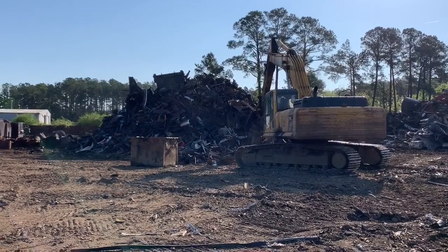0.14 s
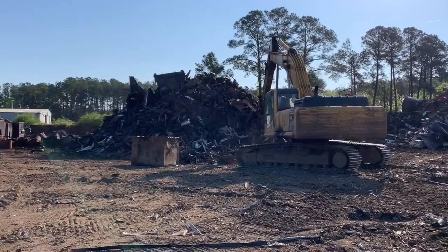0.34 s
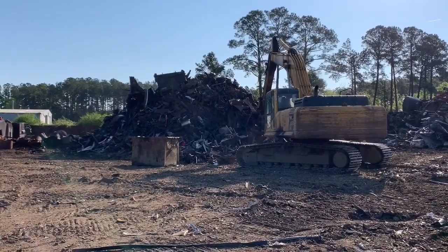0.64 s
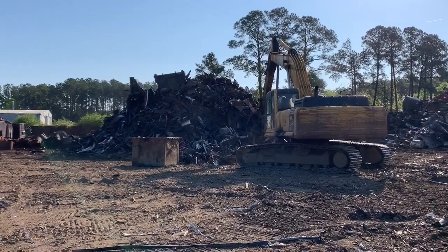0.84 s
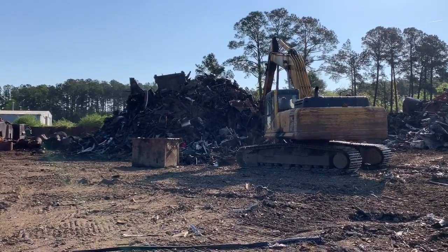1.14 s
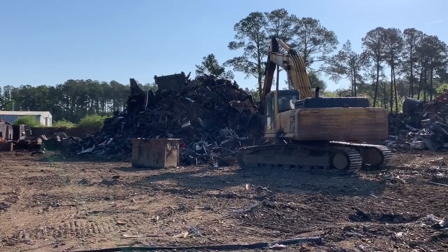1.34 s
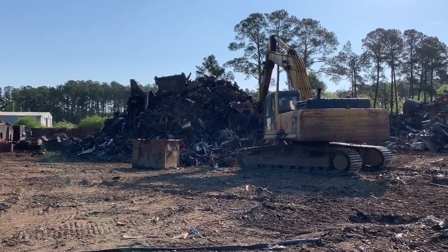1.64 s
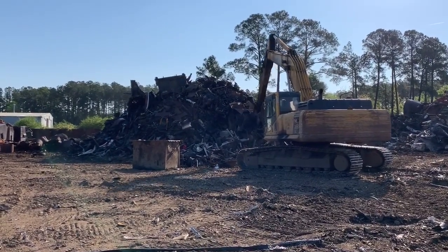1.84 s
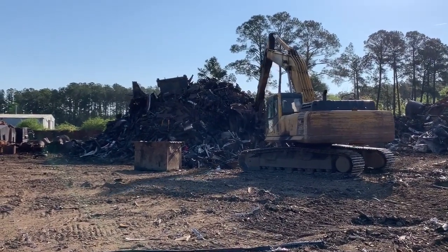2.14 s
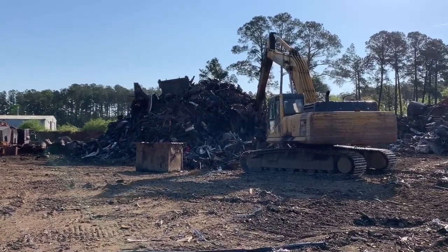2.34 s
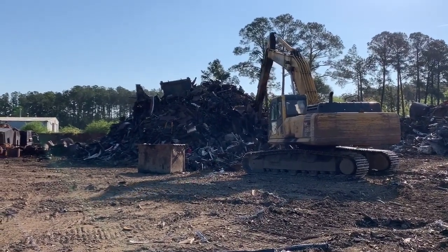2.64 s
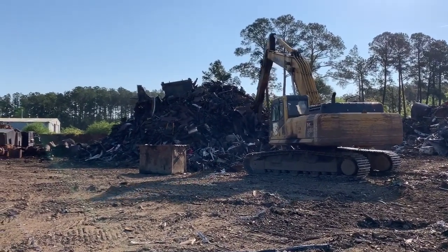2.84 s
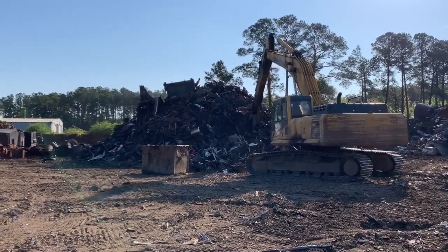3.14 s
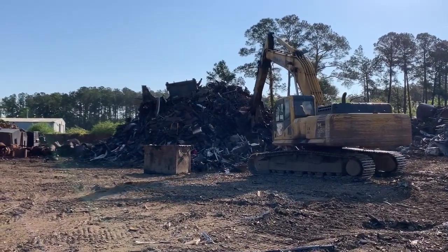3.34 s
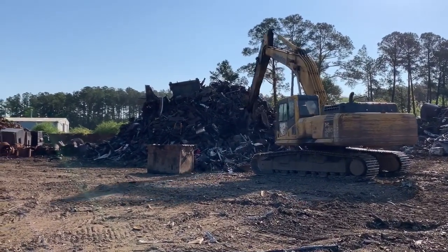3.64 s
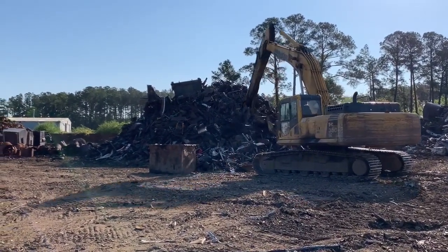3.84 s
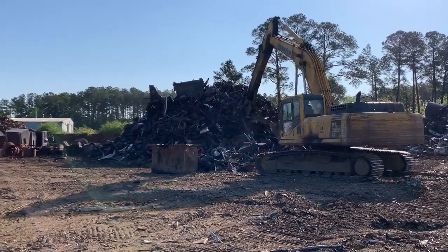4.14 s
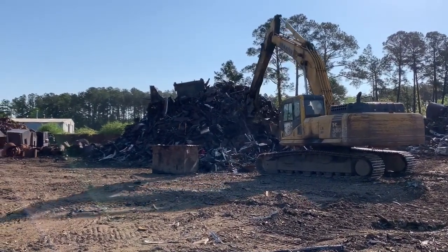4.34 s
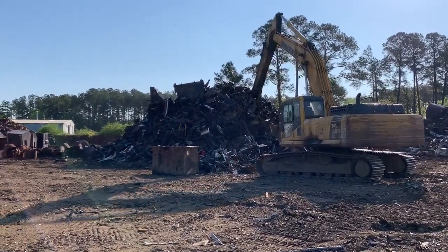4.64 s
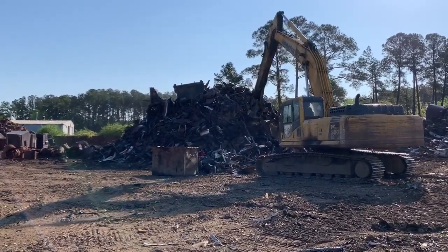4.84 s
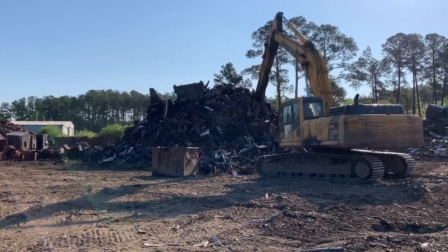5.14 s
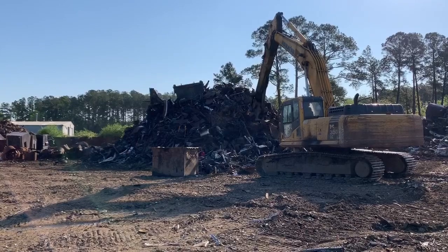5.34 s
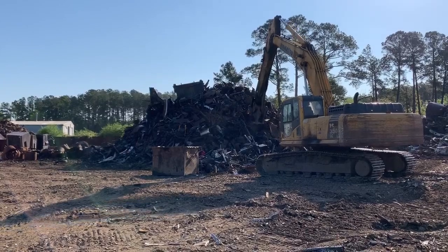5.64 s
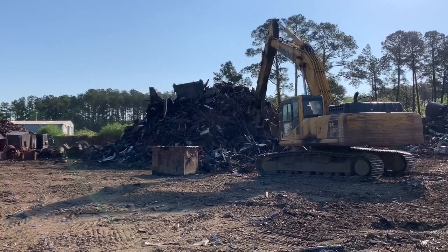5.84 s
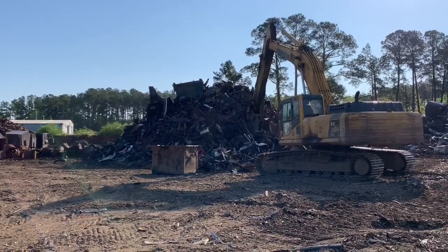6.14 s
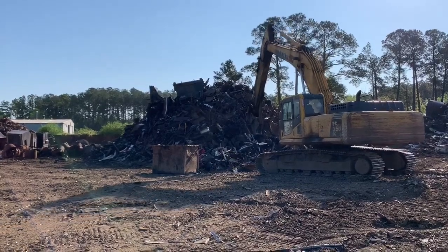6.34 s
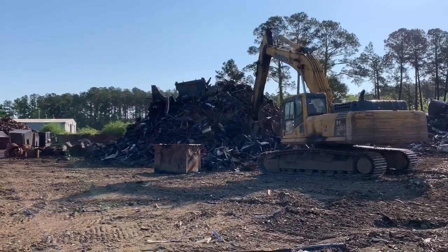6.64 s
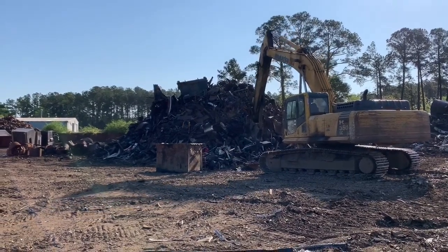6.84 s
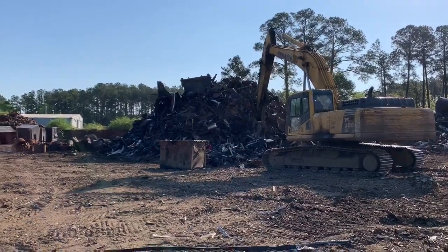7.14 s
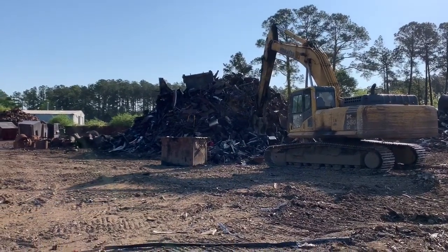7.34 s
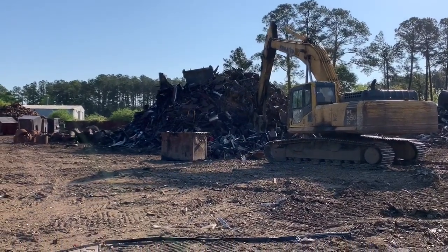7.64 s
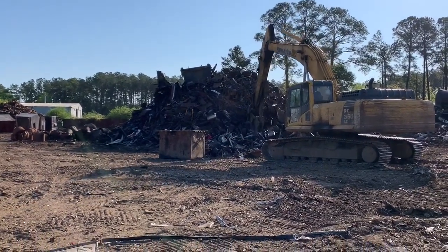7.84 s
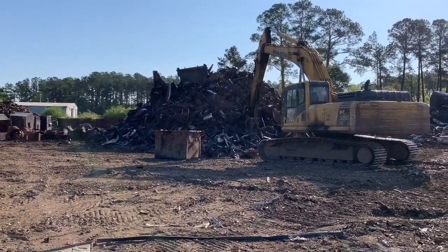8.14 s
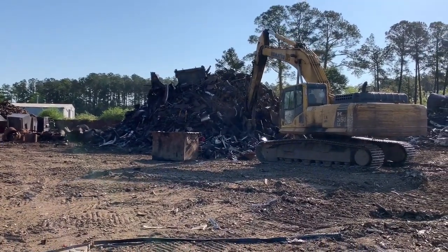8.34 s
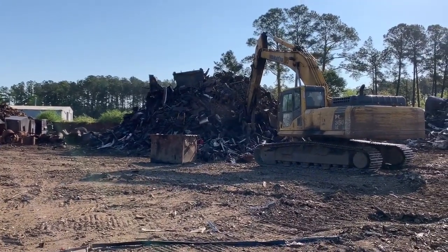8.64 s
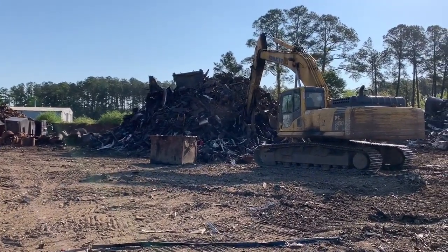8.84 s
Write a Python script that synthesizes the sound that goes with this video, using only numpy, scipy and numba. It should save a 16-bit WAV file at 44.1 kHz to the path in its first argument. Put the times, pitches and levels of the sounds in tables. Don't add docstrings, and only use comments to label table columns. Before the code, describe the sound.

A diesel excavator drones steadily in an open scrap yard while its grab drags metal, with clanks, knocks, clinks and sliding scrap throughout.

```python
import sys
import numpy as np
from scipy import signal
from scipy.fft import rfft, irfft, next_fast_len
from scipy.io import wavfile
from scipy.ndimage import uniform_filter1d
from numba import njit

SR = 44100
rng = np.random.default_rng(int(sys.argv[2]) if len(sys.argv) > 2 else 0)


def dump(signal):
    limited = np.clip(np.atleast_2d(signal).T, -1, 1)
    pcm = np.round(limited * 32767).astype(np.int16)
    wavfile.write(sys.argv[1], SR, pcm)


def undo_db(level):
    steps = np.asarray(level, float) / 20
    return 10 ** steps


N = 396018

# time in seconds, firing rate
# in Hz, level in dB.
EXHAUST = [(0.0, 101, -16), (0.45, 101.8, -16), (0.7, 100.2, -15), (1.5, 99, -14.5), (2.0, 100.4, -14.5),
           (2.45, 102.5, -16.5), (3.1, 98.9, -16), (3.36, 100.4, -18.5), (3.6, 101.9, -24.5),
           (4.1, 102.3, -27.5), (4.7, 101.3, -24.5), (5.5, 101.8, -19.5), (6.2, 101.7, -21.5),
           (7.0, 102.8, -18.5), (7.5, 101.7, -19.5), (7.78, 100.2, -18), (8.3, 101.7, -20),
           (8.98, 100.8, -20.5)]
# time in seconds, blade-pass rate in Hz, level in dB.
FAN_RUN = [(0.0, 151.5, -19.5), (.6, 150.6, -19), (1.5, 147.1, -17.5), (2.0, 149.5, -19),
           (2.63, 151.9, -20.5), (2.9, 147.4, -21), (3.3, 146.9, -21.5), (3.45, 149, -29), (4.03, 152, -30),
           (4.65, 149.4, -28.5), (5.1, 151.8, -24.5), (6.25, 150.3, -25), (6.85, 153, -23.5),
           (7.5, 151, -23.5), (7.85, 146.5, -23), (8.1, 150, -24), (8.7, 152.9, -24.5), (8.98, 150.7, -28)]
# multiple of the blade pass, level in dB.
FAN_HARMONICS = [(2, -14), (3, -23.5)]
# time in seconds, pitch in Hz, level in dB.
TURBO_WHISTLE = [(0, 10400, -85), (5.9, 10350, -68), (6.3, 10600, -60), (6.8, 10800, -60),
                 (7.0, 10650, -59), (7.5, 10600, -59), (8.98, 10600, -85)]
# frequency in Hz, gain in dB.
ROAR_SPECTRUM = [(24, -31), (50, -1.2), (80, 2), (125, 2), (180, 2.5), (260, -3.5), (450, -10),
                 (700, -17.5), (1100, -16), (2000, -18.5), (3000, -25.5), (5200, -32.5), (7500, -29.5),
                 (15500, -35.5)]
# centre in seconds, depth in dB, half-width in seconds.
EXHAUST_FADES = [(2.44, -7.5, 0.054), (2.75, -3.5, .08), (5.14, -10, 0.061), (5.69, -10, 0.043),
                 (6.93, -11, 0.026), (7.23, -11, 0.055), (8.6, -3.5, 0.12)]
# centre in seconds, depth in dB, half-width in seconds.
PUMP_NOTE_FADES = [(1.5, -2.5, 3), (8.6, -2.5, .8), (4.9, -5, 0.11), (5.6, -3, 0.13), (6.75, -4.5, 0.14),
                   (7.05, -5, .08)]
# start in seconds, peak in dB, main mode in Hz, treble in dB.
HEAVY_KNOCKS = [(0.055, -8, 660, -8), (0.188, -7.5, 990, -16.5), (0.507, -13, 3700, -4),
                (0.57, -12, 2270, -7), (0.593, -13, 2390, -6), (1.088, -8, 984, -14),
                (2.372, -4.5, 3230, -13.5), (2.847, -10.5, 730, -3.5), (3.252, -10, 1000, -3),
                (3.466, -1, 1345, -29), (3.811, -17, 874, -3), (3.882, -5, 730, -13), (4.157, -11, 867, -5),
                (4.285, -10, 790, -7), (4.543, -12, 657, -24), (4.618, -11.5, 1055, -6),
                (4.791, -11.5, 740, -15), (5.147, -10, 648, -18), (5.311, -13, 1057, -8),
                (5.453, -16, 667, -10), (5.748, -17, 760, -22), (6.417, -17, 652, -23.5),
                (6.721, -23, 665, -9.5), (6.954, -15, 830, -13), (7.463, -3.5, 827, -7),
                (7.519, -9, 1144, -7), (7.6, -11, 1360, -14), (7.964, -17, 2293, -9),
                (8.484, -10, 1215, -3), (8.724, -5.5, 1362, -15)]
# start in seconds, peak in dB, centre in Hz.
STEEL_CRACKS = [(.508, -18, 3980), (.53, -20, 2250), (.571, -17, 2000), (0.593, -16, 2300),
                (.5935, -22, 4000), (.63, -23, 3600), (1.0884, -17, 1000), (3.885, -12, 900),
                (4.106, -22, 700), (4.157, -14.5, 1480), (4.231, -19, 1028), (4.286, -18, 1100),
                (4.543, -17, 700), (4.618, -17, 1100), (4.792, -22, 798), (5.123, -20, 600),
                (5.146, -11, 650), (5.146, -24, 2460), (5.311, -20, 1800), (5.731, -25, 616),
                (5.748, -18, 600), (6.322, -21, 802), (6.418, -20, 600), (6.9, -20, 700), (6.953, -20, 830),
                (7.461, -16, 1200), (7.468, -9, 1700), (7.489, -11, 700), (7.525, -14, 1800),
                (7.784, -12, 1897), (7.82, -14, 2600), (7.88, -14.5, 2800), (8.015, -16, 3000),
                (8.078, -10, 872), (8.127, -10, 1430), (8.156, -11, 1430), (8.175, -15.5, 3000),
                (8.365, -18, 700), (8.499, -15.5, 699), (8.527, -17, 700)]
# start in seconds, peak in dB, pitch in Hz.
BLUNT_THUDS = [(1.095, -11, 956), (4.157, -13, 985), (4.285, -17, 810), (4.543, -11, 611),
               (4.792, -24, 600), (5.146, -5.5, 640), (5.748, -14, 530), (6.418, -15, 590),
               (7.468, -16, 826)]
# start in seconds, peak in dB.
SHARD_CLINKS = [(0.0398, -22), (0.182, -27), (1.4017, -20.5), (1.6523, -20), (2.2994, -19.5), (2.372, -8.5),
                (2.5736, -15.5), (3.093, -13.5), (3.2336, -16), (3.466, -10), (3.812, -13.5),
                (4.157, -22.5), (4.2882, -25), (4.4236, -22.5), (4.617, -25), (4.9696, -28),
                (5.1548, -25.5), (5.2086, -29), (6.736, -25), (6.84, -26.5), (7.424, -27), (7.4602, -27),
                (7.5847, -24), (7.7607, -23), (8.0034, -11.5), (8.1534, -15), (8.272, -25), (8.2933, -14.5),
                (8.4807, -19), (8.5974, -22)]
# start in seconds, pitch in Hz, level in dB, T60 in seconds.
RINGING_PIECES = [(.495, 12580, -22, .12), (3.885, 715, -19.5, 0.45), (3.91, 665, -23.5, 0.55),
                  (3.97, 715, -26, .4), (4.62, 1070, -30.5, .25), (4.62, 1170, -31, .25),
                  (7.86, 820, -22, .25), (5.42, 400, -31, .3), (5.8, 490, -30, 0.1203),
                  (1.09, 380, -22, 0.23), (3.885, 2331, -30.5, 0.27), (4.299, 1100, -25.5, 0.41),
                  (5.144, 2460, -22, 0.054), (5.146, 706, -29, 0.075), (6.42, 430, -29, 0.302),
                  (7.485, 14300, -37, 0.19), (7.505, 7900, -30, 0.09), (7.47, 370, -24, 0.35),
                  (7.47, 530, -26, 0.37), (7.77, 1430, -25, 0.61), (8.03, 1430, -25, 0.4),
                  (8.125, 1430, -20, .2), (8.55, 1430, -23, 0.52), (7.96, 2300, -24, 0.12),
                  (8.29, 6200, -29, 0.11)]
# start in seconds, level in dB.
PART_BLOWS = [
    (.507, -26.5),
    (.57, -25.5),
    (.594, -23.5),
]
# frequency in Hz, level in dB, T60 in seconds.
PART_MODES = [(1650, -11, .1), (1850, -0.5, .13), (2150, -2.5, .2), (2394, -1, 0.12), (2710, -11, .11),
              (3340, -10, 0.098), (3610, -5, 0.16), (4020, -8, 0.09), (4430, -10, .09)]
# lowest mode in Hz, highest mode in Hz, knocks per second, T60 in seconds.
PIECE_SIZES = [
    (327.8, 1700, 500, 0.16),
    (1588.5, 5600, 1200, 0.2),
    (5606, 13000, 3600, 0.093),
    (180, 340, 120, 0.14),
]
RISE_SHARES = (1.02, 0.92, 0.89, 1.01)
# frequency in Hz, gain in dB.
METAL_SPECTRUM = [(250, -23), (550, 0.5), (1100, 0), (1800, -2.5), (2700, -5.5), (4000, -10.5),
                  (5200, -15.5), (6600, -13.5), (10000, -15.5), (15500, -19)]
# peak time in seconds, plate level in dB,
# rise in seconds per 10 dB, fall in seconds per 10 dB, dullness in dB.
PILE_SLIDES = [(0.01, -22.5, 3, 0.1, 5.5), (0.75, -29.5, 2.5, 3.5, 11), (0.52, -39, -0.7, 0.3, 3),
               (1.105, -19, 0, 0, 15), (1.4, -23, -0.03, 0.14, 9.5), (1.66, -22.5, 0.1, 1.34, 4.5),
               (2.05, -20.5, .6, 0.13, 5.5), (2.38, -27.5, 0.23, 1, 2.5), (2.65, -35, 0.16, 1, 11),
               (3.08, -21, 0.43, -0.56, 12), (3.341, -19, 0.42, 0.02, 1.5), (3.492, -21.5, 0.33, 0.03, 0.5),
               (3.55, -24, 0.78, 0.45, 0), (3.92, -21, 0.16, .13, 3.5), (4.165, -29, 0.3, .1, 3),
               (4.295, -25, -0.2, 0.21, 3.5), (4.63, -33, -1.2, -0.5, 21), (5.16, -30, -0.3, 0.2, 13),
               (5.315, -25.5, -0.2, 0.06, 14), (6.95, -31, 0.2, 1.8, 11), (7.475, -20, 0.03, 0.3, 10.5),
               (7.82, -18, 0.1653, 0.31, 3), (8.166, -18.5, 0.01, 0.17, 7.5), (8.6, -21.5, 0.16, 0.3, 5),
               (1.063, -32.5, 0.098, 0.06, 2), (0.62, -35, 0.018, .12, 2), (4.55, -39, 0.011, 0.052, 26),
                  (4.8, -31, .01, 0.033, 15), (6.42, -33, .2, 0.18, 14), (6.75, -36.5, 0.11, 0.19, 0.5),
                  (6, -39, .05, .05, 2), (7.6, -26.5, 0.04, 0.13, 8), (9.6, -24, .03, .08, 3),
                  (2.595, -19.5, 0.033, 0.031, 6), (4.46, -29, 0.13, 0.059, 5.5),
                  (4.4, -26.5, .01, 0.078, 2), (3.12, -18.5, 0.041, 0.036, 5),
                  (8.08, -24.5, 0.036, .04, 13), (2.87, -25, 0.045, .1, 2), (0.704, -32.5, .05, .1, 2)]
# frequency in Hz, likeness from 0 to 1, right minus left in dB.
PORT_PAIR = [(60, 1, 0), (570, .96, 0), (1114, 0.87, 0), (1200, 0.83, -7), (1700, 0.64, 2), (2070, 0.7, -2),
             (2980, 0.96, 2), (4480, 0.68, 5.5), (5730, 0, 2), (6370, 0.92, 1), (9600, 0.84, 0.8),
             (15000, 0.8, 3)]
# frequency in Hz, lead in radians.
ENGINE_PHASE = [(0, 0), (1550, 0), (1800, 3.1), (2100, 6.0), (2500, 4.8), (3300, 6.2), (4600, 6.0),
                (5500, 3.6), (7000, 5.1), (8500, 3.14), (11000, 0), (13500, -3.14), (16000, -6.3)]
# frequency in Hz, lead in radians.
PILE_PHASE = [(0, 0), (1450, .5), (1750, 3.1), (2050, 6.0), (3200, 7.7), (4800, 9.2), (6000, 6.3),
              (8500, 3.14), (11000, 0), (13500, -3.14), (16000, -6.3)]
# low edge in Hz, high edge in Hz, share left.
SUM_GAPS = [(8050, 8950, 0), (12800, 14250, 0), (15850, 23000, 0)]
# low edge in Hz, high edge in Hz, share left.
DIFFERENCE_GAPS = [(10400, 12200, .3), (15200, 23000, 0)]


def engine():
    firing_hz, exhaust_db = curves(EXHAUST)
    fan_hz, fan_db = curves(FAN_RUN)
    turbo_hz, turbo_db = curves(TURBO_WHISTLE)
    loudness_db = exhaust_db + 15
    firing_db = exhaust_db + fades(EXHAUST_FADES)
    pump_db = -34.5 - 0.081 * loudness_db + fades(PUMP_NOTE_FADES)
    pump_hz = 600 * (1 + 0.00431 * drift(1.31))

    out = undo_db(firing_db) * tone(firing_hz, fuzz=0.12, width_hz=16.5)
    out += undo_db(firing_db - 13.5 + 0.18 * loudness_db) * tone(2 * firing_hz, fuzz=0.11, width_hz=7.1)
    out += undo_db(fan_db - 2.5) * tone(fan_hz, fuzz=0.09, width_hz=8)
    for multiple, db in FAN_HARMONICS:
        out += undo_db(fan_db + db - 0.32 * loudness_db) * tone(multiple * fan_hz, fuzz=0.34, width_hz=11)
    out += undo_db(pump_db) * tone(pump_hz, fuzz=0.21, width_hz=24)
    out += undo_db(turbo_db) * tone(turbo_hz, fuzz=0.25, width_hz=19.8)

    throb = 1 + 0.12 * np.cos(2 * np.pi * np.cumsum(firing_hz) / SR)
    roar = shaped(throb * rng.standard_normal(N), lambda hz: undo_db(read(hz, *np.transpose(ROAR_SPECTRUM))))
    roar_db = -33 + 0.6 * loudness_db
    return out + undo_db(roar_db + 9.5 + 0.57 * drift(6.7)) * evened(roar)


def blows():
    out = np.zeros(N)
    for s, *row in HEAVY_KNOCKS:
        add(out, s, knock(*row))
    for s, *row in STEEL_CRACKS:
        add(out, s, crack(*row))
    for s, *row in BLUNT_THUDS:
        add(out, s, thud(*row))
    for s, *row in SHARD_CLINKS:
        add(out, s, clink(*row))
    for s, *row in RINGING_PIECES:
        add(out, s, ring(*row))
    for s, blow_db in PART_BLOWS:
        for hz, db, t60 in PART_MODES:
            mode_hz = hz * rng.uniform(0.95, 1.03)
            mode_db = blow_db + db + 1.7 * rng.standard_normal()
            add(out, s, ring(mode_hz, mode_db, min(t60, 0.16)))
    return out


def knock(db, hz, treble_db):
    t = np.arange(9000) / SR
    noise = rng.standard_normal(len(t))
    ratios = 1 + 2.5 * rng.random((2, 1))
    body = evened(shaped(noise, lambda f: 1 / (1 + (400 / (f + 1)) ** 4) / (1 + (f / 1800) ** 4)))
    edge = evened(shaped(noise, lambda f: 1 / (1 + (2000 / (f + 1)) ** 4) / (1 + (f / 5000) ** 10)))
    overtones = np.sin(2 * np.pi * hz * ratios * t).sum(0)
    modes = np.sin(2 * np.pi * hz * t) + 0.43 * overtones
    return undo_db(db - 16) * rattle(t, 0.1) * (body + undo_db(treble_db - 1) * edge + 0.65 * modes)


def crack(db, hz):
    t = np.arange(3000) / SR
    t60, width_octaves = 0.058, 0.33
    burst = shaped(rng.standard_normal(len(t)),
                   lambda f: 1 / (1 + (np.log2((f + 1) / hz) / width_octaves) ** 2) ** 1.4)
    return undo_db(db - 6.5 - 60 * t / t60) * evened(burst)


def thud(db, hz):
    turns = hz * np.arange(SR // 2) / SR
    swell = np.sin(np.pi * np.minimum(turns / 5.2, 1) ** 0.77)
    return undo_db(db - 6.5) * swell * np.sin(2 * np.pi * turns)


def clink(db):
    t = np.arange(6000) / SR
    burst = shaped(rng.standard_normal(len(t)),
                   lambda f: 1 / (1 + (5500 / (f + 1)) ** 6) / (1 + (f / 11000) ** 3))
    return undo_db(db - 8) * rattle(t, 0.091) * evened(burst)


def ring(hz, db, t60):
    t = np.arange(SR // 2) / SR
    chatter = evened(shaped(rng.standard_normal(len(t)), lambda f: 1 / (1 + (f / (0.05 * hz)) ** 4)))
    envelope = undo_db(db) * rattle(t, t60) * (1 - np.exp(-t / 0.0033))
    return envelope * (0.92 + 0.64 * chatter) * np.sin(2 * np.pi * hz * t)


def rattle(t, t60):
    return undo_db(-60 * (t / max(t60, 0.02)) ** 1.6) * (1 - np.exp(-t / 0.0007))


def pile():
    out = np.zeros(N)
    jolts = undo_db(drift(30))
    dull_shares = (0.013, 0.98, 1.15, 0.7)
    own_dbs = (0, 0, -3, -12.5)
    for piece, dull_share, own_db, rise_share in zip(PIECE_SIZES, dull_shares, own_dbs, RISE_SHARES):
        low_hz, high_hz, per_s, t60 = piece
        picks = rng.random((30000, 3))[:int(per_s * N / SR)]
        knocks = evened(struck(picks, low_hz, high_hz, t60, 1.8, N, SR))
        rough = 0.59 * knocks + 0.97 * rng.standard_normal(N)

        def band(hz):
            edges = (1 + (low_hz / (hz + 1)) ** 8) * (1 + (hz / high_hz) ** 8)
            return undo_db(read(hz, *np.transpose(METAL_SPECTRUM))) / np.sqrt(edges)

        out += undo_db(slides(dull_share, rise_share) + own_db) * jolts * evened(shaped(rough, band))
    heavy = shaped(out, lambda hz: 1 / (1 + (hz / 745) ** 6) / (1 + (400 / (hz + 1)) ** 6))
    thinner = np.clip((np.arange(N) / SR - 7.6) / 0.12, 0, 1)
    return out - 0.26 * thinner * heavy


@njit
def struck(picks, low_hz, high_hz, t60, spread_db, size, rate):
    out = np.zeros(size)
    for place, pitch, strength in picks:
        hz = low_hz * (high_hz / low_hz) ** pitch
        step = np.exp(complex(-np.log(1000) / t60, 2 * np.pi * hz) / rate)
        swing = complex(10 ** (-spread_db * np.log(1 - strength * 0.99) / 20), 0)
        start = int(place * size)
        for n in range(start, min(start + int(t60 * rate / 2), size)):
            swing *= step
            out[n] += swing.imag
    return out


def slides(dull_share, rise_share):
    t = np.arange(0, N + 100, 100) / SR
    power = undo_db(2 * (-36.5 - dull_share * 18))
    for s, db, rise_s, fall_s, dull_db in PILE_SLIDES:
        rise = abs(t - s) / max(rise_share * rise_s, 0.003)
        fall = (abs(t - s) / max(fall_s, 0.003)) ** 1.16
        away = np.where(t < s, rise, fall)
        power = power + undo_db(2 * (db - dull_share * dull_db - 10 * away))
    return np.interp(np.arange(N) / SR, t, 10 * np.log10(power))


def tone(hz, fuzz, width_hz):
    swing = 1 - fuzz + fuzz * (drift(width_hz) + 1j * drift(width_hz))
    return evened((swing * np.exp(2j * np.pi * np.cumsum(hz) / SR)).real)


def fades(events):
    t = np.arange(N) / SR
    return sum(db * np.exp(-((t - s) / width) ** 2) for s, db, width in events)


def drift(hz):
    coarse = shaped(rng.standard_normal(N // 100 + 2), lambda f: (f > 0) / (1 + (f / 100 / hz) ** 4))
    return evened(np.interp(np.arange(N) / 100, np.arange(len(coarse)), coarse))


def shaped(x, gain):
    size = next_fast_len(len(x))
    return irfft(rfft(x, size) * gain(np.fft.rfftfreq(size, 1 / SR)), size)[:len(x)]


def evened(x):
    return x / np.sqrt(np.mean(x ** 2) + 1e-20)


def read(hz, f, value):
    return np.interp(np.log(hz + 1), np.log(np.asarray(f) + 1), value)


def curves(rows):
    s, *columns = np.transpose(rows)
    return [np.interp(np.arange(N) / SR, s, c) for c in columns]


def add(mix, s, sound):
    part = mix[round(s * SR):][:len(sound)]
    part += sound[:len(part)]


def ports(x, lead, size):
    f, alike, right_db = np.transpose(PORT_PAIR)
    hz, t, z = signal.stft(x, SR, nperseg=size)
    same = np.clip(read(hz, f, alike), 0, 1)[:, None]
    direct = np.exp(-1j * np.interp(hz, *np.transpose(lead)))[:, None]
    scatter = np.exp(2j * np.pi * rng.random(z.shape[::-1]).T)
    arriving = same * direct + 1.46 * np.sqrt(1 - same ** 2) * scatter
    right = z * undo_db(read(hz, f, right_db))[:, None] * arriving
    return np.array([x, signal.istft(right, SR, nperseg=size)[1][:N]])


def scene():
    return ports(engine(), ENGINE_PHASE, size=2048) + ports(pile() + blows(), PILE_PHASE, size=512)


def dropped(x, gaps):
    hz, t, z = signal.stft(x, SR, nperseg=2048)
    for low_hz, high_hz, left in gaps:
        wander = 170 * np.round(1.6 * uniform_filter1d(rng.standard_normal((2, len(t))), size=2))
        wander = wander * (high_hz < SR / 2)
        outside = (hz[:, None] < low_hz + wander[0]) | (hz[:, None] > high_hz + wander[1])
        z = z * np.where(outside, 1, left)
    return signal.istft(z, SR, nperseg=2048)[1][:N]


def band_limit(x):
    return signal.sosfilt(signal.butter(12, 17080, fs=SR, output="sos"), x)


def record(dry):
    limited = 1.3 * np.tanh(dry / 1.3)
    mid = dropped((limited[0] + limited[1]) / 2, SUM_GAPS)
    side = dropped((limited[0] - limited[1]) / 2, DIFFERENCE_GAPS)
    return band_limit(np.array([mid + side, mid - side]))


dry = scene()
out = record(dry)
dump(out)
```